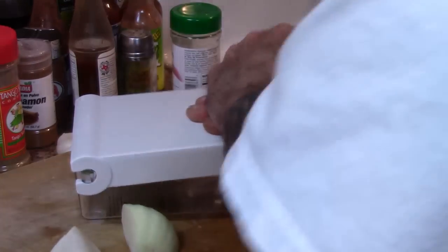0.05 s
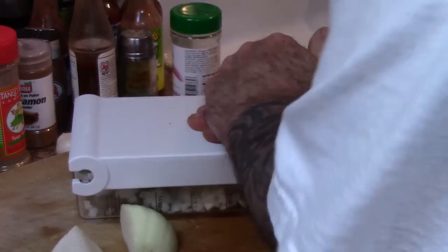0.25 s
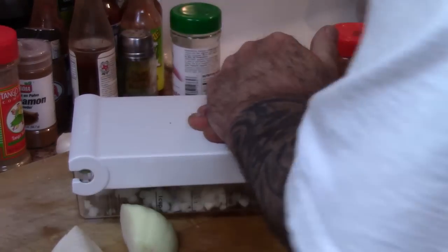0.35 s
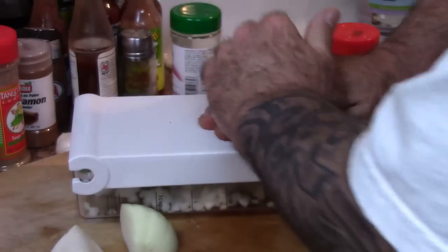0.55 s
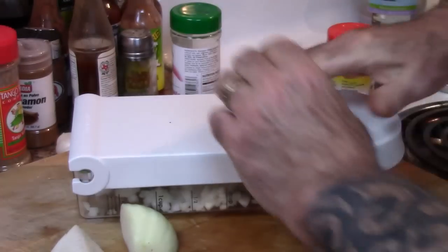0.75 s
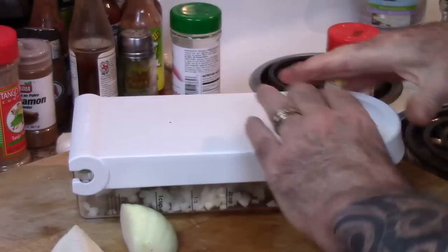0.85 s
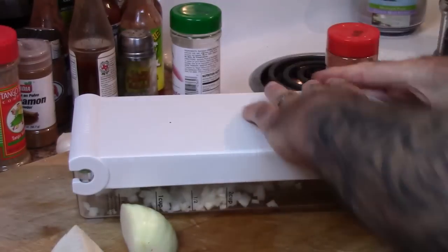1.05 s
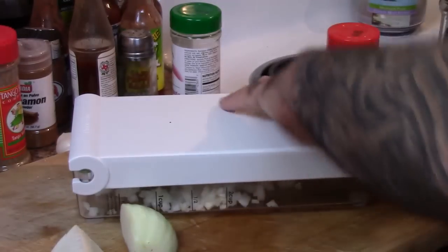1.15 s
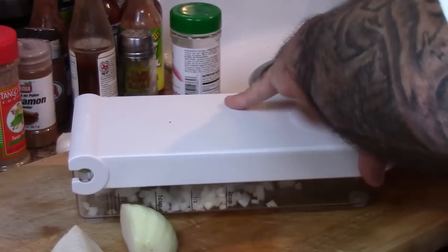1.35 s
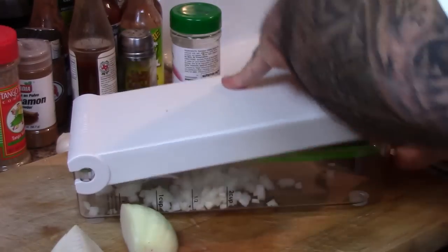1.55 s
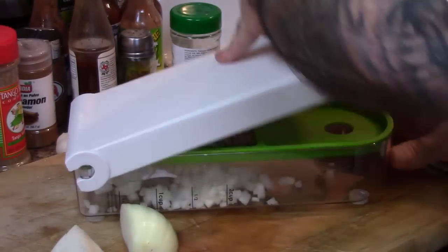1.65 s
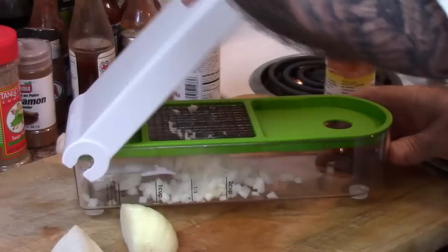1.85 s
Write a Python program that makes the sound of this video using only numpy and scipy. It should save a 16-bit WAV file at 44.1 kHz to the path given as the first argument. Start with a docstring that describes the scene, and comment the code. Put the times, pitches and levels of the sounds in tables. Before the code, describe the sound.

A plastic chopper slams shut through onion, a brief crunch bursting into a loud clattering crack with a low worktop boom. Quiet hand rubs, pats and lid clicks follow in a small, humming kitchen, closely miked.

```python
"""A plastic chopper in front of two close microphones: onion creaks and crunches through the blade
grid as a stream of tiny snaps, which swells into the slam of the lid on the tray: a dense wash of
snaps, bursts of noise and ringing modes. Fingers slide, pat and squeak on the lid, which unsticks
with a click and rattles open. Around it a small hard-walled kitchen hums and a sleeve rustles;
the slam drives the recorder's gain control far down, and it creeps back only slowly."""
import sys
import numpy as np
from scipy import signal
from scipy.fft import rfft, irfft, next_fast_len
from scipy.io import wavfile
from scipy.ndimage import uniform_filter1d, map_coordinates

SR = 44100
rng = np.random.default_rng(int(sys.argv[2]) if len(sys.argv) > 2 else 0)


def file_out(sig):
    """Save sig as 16-bit WAV at sys.argv[1]."""
    # one column per channel
    cols = np.atleast_2d(sig).T
    # limit, then scale
    lim = np.clip(cols, -1, 1)
    pcm = np.round(lim * 32767).astype(np.int16)
    wavfile.write(sys.argv[1], SR, pcm)


N = 83790

# shut lid and tray ringing together: pitch_hz, relative level_db, t60_s
CHOPPER_MODES = [(320, -6.5, 0.077), (485, -1.5, 0.11), (607, -2, 0.04), (719.4, -2.5, 0.057),
                 (941, 3.5, 0.017), (1050, -22, 0.039), (1345, -10, 0.074), (1536, -4, 0.033),
                 (1730, -5, 0.04), (2246, -7.5, 0.051), (3360, -1, 0.014), (3657, 0.5, 0.016),
                 (3967, -1, 0.027), (4337, 6, 0.007)]
# lid ringing freely once off the tray: pitch_hz, relative level_db, t60_s
LID_MODES = [(552.5, 5, 0.041), (750, -7, 0.025), (945, -1.5, 0.056), (1380, -8, .05), (1690, -21, 0.037),
             (1940, -16, 0.059), (2200, -11, 0.032), (3068, -12, 0.044), (3460, -6.5, .022),
             (3800, -3.5, 0.024), (4402, -25, 0.025)]
# tone of skin or pegs rubbing on plastic: frequency_hz, relative level_db
RUBBING_TONE = [(100, -17), (410, 0), (710, -0.5), (1210, -1), (2620, -7), (3650, -8), (5050, -18.5),
                (10000, -31)]


def amp(db):
    """Decibels to gain."""
    return 10 ** (np.asarray(db) / 20)


def unit(x):
    """Scale to rms 1."""
    return x / np.sqrt(np.mean(x ** 2) + 1e-20)


def along(points, hz):
    """Read a curve of (Hz, value) points on a log frequency axis."""
    point_hz, values = np.transpose(points)
    return np.interp(np.log(hz + 1), np.log(point_hz + 1), values)


def level(rows):
    """Gain per sample from (s, dB) points."""
    return amp(np.interp(np.arange(N) / SR, *np.transpose(rows)))


def wobble(rate):
    """A smooth random curve with rate knots a second."""
    knots = rng.standard_normal(int(N * rate / SR) + 4)
    return map_coordinates(knots, [np.arange(N) * rate / SR])


def coloured(x, points):
    """Causal minimum-phase filter with the given (Hz, dB) shape."""
    m = 2 * next_fast_len(x.shape[-1])
    cepstrum = irfft(np.log(amp(along(points, np.fft.rfftfreq(m, 1 / SR)))))
    # fold the cepstrum forward so that nothing sounds ahead of its cause
    cepstrum[1:m // 2] *= 2
    cepstrum[m // 2 + 1:] = 0
    response = np.exp(rfft(cepstrum))
    return irfft(rfft(x, m) * response)[..., :x.shape[-1]]


def add(track, s, sound):
    """Mix a sound into the track at time s."""
    part = track[round(s * SR):][:len(sound)]
    part += sound[:len(part)]


def appliances():
    """Steady tones, wavering in level and phase, hum like motors over a soft rush of filtered noise."""
    # motor tones: pitch_hz, level_db before waver
    tones = [(59.1, -44), (118.3, -54.5), (172.2, -46), (237.2, -51), (268.8, -46), (355.2, -59.5),
             (1243, -64)]
    # tone of the room noise: frequency_hz, relative level_db
    air_tone = [(20, -44), (50, 6.5), (100, -4), (200, -1.5), (280, 1), (450, -2), (640, -14.5),
                (920, -13.5), (1500, -23), (2500, -34), (3600, -18), (5000, -36.5), (9000, -45.5),
                (12000, -46)]
    air_db, waver_db = -39.5, 2
    t = np.arange(N) / SR
    hum = np.zeros(N)
    for hz, db in tones:
        loudness = amp(db + waver_db * wobble(10.72)) * np.sqrt(2)
        phase = 2 * np.pi * (hz * t + rng.random()) + 0.19 * wobble(3.4)
        hum += loudness * np.sin(phase)
    air = unit(coloured(rng.standard_normal(N), air_tone))
    return hum + amp(air_db) * air


def room_tail():
    """Hard, close walls answer with short, dense noise whose decay time depends on frequency."""
    # reverberation of the kitchen: frequency_hz, t60_s
    decay = [(100, 0.29), (400, .3), (1200, 0.34), (3200, .35), (6000, .32), (10000, 0.37)]
    build_up_s = 0.0037
    hz, t, bins = signal.stft(rng.standard_normal(SR), SR, nperseg=256)
    fading = amp(-60 * t / along(decay, hz)[:, None])
    spectrum = rfft(signal.istft(bins * fading, SR, nperseg=256)[1])
    # even out the broad spectrum, so that only the decay colours the room
    power = np.convolve(np.abs(spectrum) ** 2, np.hanning(81), "same")
    tail = irfft(spectrum / np.sqrt(power))[:SR // 2]
    tail = tail * (1 - np.exp(-(np.arange(len(tail)) / SR / build_up_s) ** 2))
    return tail / np.linalg.norm(tail)


def kitchen(x, room_db, count=4):
    """Direct sound plus room; successive moments take turns among tails, so the decay stays diffuse."""
    hop_s = 0.008
    turn = np.arange(N) / SR / hop_s
    room = np.zeros(N)
    for k in range(count):
        share = np.sin(np.pi / 2 * np.minimum((turn - k) % count, 2))
        room += signal.fftconvolve(x * share, room_tail())[:N]
    return x + amp(room_db) * room


def microphones(mid):
    """Two close capsules share the sound ahead and differ only by scatter, faint but for the top."""
    # scatter against the shared sound: frequency_hz, relative level_db
    width = [(60, -29), (150, -30.5), (400, -31.5), (1420, -20.5), (4090, -19), (11800, -4)]
    scatter = irfft(np.exp(2j * np.pi * rng.random(size=129)))
    side = coloured(signal.fftconvolve(mid, scatter)[:N], width)
    return np.array([mid + side, mid - side])


def sleeve():
    """Cloth brushing past gives filtered noise that flutters as the arm moves."""
    # brushing: time_s, level_db before flutter
    brushing = [(0, -51), (.14, -59), (.6, -61), (.76, -55), (1.1, -56), (1.25, -53.5), (1.38, -56.5),
                (1.6, -55.5), (1.89, -66)]
    # tone of the cloth: frequency_hz, relative level_db
    cloth_tone = [(200, -8.5), (900, 3.5), (2400, -4.5), (3700, 1.05), (5000, -7), (9000, -17),
                  (12000, -21.5)]
    flutter_db = 1.5
    rustle = unit(coloured(rng.standard_normal(N), cloth_tone))
    return rustle * level(brushing) * amp(flutter_db * wobble(57))


def counter():
    """The slam sets the worktop booming in a few low decaying modes."""
    # worktop modes: pitch_hz, level_db, t60_s
    worktop = [(65.46, -7, 0.28), (98.4, -6.5, 0.38), (128, 8, 0.12), (168.2, -0.5, 0.16), (367, -24, 0.22)]
    slam_s, rise_s = 0.245, 0.008
    out, t = np.zeros(N), np.arange(SR // 2) / SR
    boom = sum(amp(db - 60 * t / t60) * np.sin(2 * np.pi * hz * t) for hz, db, t60 in worktop)
    add(out, slam_s, boom * (1 - np.exp(-t / rise_s)))
    return out


def thumps():
    """Soft blows rock the tray on the board for a few low, quickly damped cycles."""
    # blows: start_s, level_db, pitch_hz, t60_s
    blows = [(0.2377, -1, 382, 0.0082), (0.731, -8, 264, 0.032), (0.7517, -0.5, 197, 0.017),
             (1.237, -15, 260.1, .03), (1.4813, -10.5, 218.4, .032), (1.512, -12, 244, 0.034),
             (1.7272, -10, 422, 0.024)]
    rise_s = 0.0054
    out, t = np.zeros(N), np.arange(SR // 4) / SR
    for s, db, hz, t60 in blows:
        envelope = amp(db - 60 * t / t60) * (1 - np.exp(-t / rise_s))
        add(out, s, envelope * np.sin(2 * np.pi * hz * t))
    return out


def ring(modes, bright_hz):
    """Ringing plastic; a contact excites most the modes near its own brightness."""
    contact_tilt = 0.69  # sharp contacts spare the low modes
    t = np.arange(SR // 4) / SR
    out = np.zeros(len(t))
    for hz, db, t60 in modes:
        ratio = hz / bright_hz
        drive = ratio ** contact_tilt / np.hypot(1, ratio ** 3)
        decay = amp(db + rng.normal(0, 1) - 60 * t / t60)
        out += decay * drive * np.sin(2 * np.pi * (hz * t + rng.random()))
    return out


def grains(curve, rate, spread_db, spectrum, ring_db, body):
    """Tiny random snaps, heard directly and through the ringing plastic body."""
    happens = rng.random(N) < rate / SR
    strength = amp(spread_db * np.clip(rng.standard_normal(N), -2, 2))
    snaps = happens * rng.choice([-1, 1], N) * strength
    force = unit(snaps) * level(curve)
    tick = coloured(signal.unit_impulse(len(body)), spectrum)
    answer = tick / np.linalg.norm(tick) + amp(ring_db) * body / np.linalg.norm(body)
    return signal.fftconvolve(force, answer)[:N]


def knocks(contacts, modes, crack_t60_s):
    """Each hard contact cracks and rings the plastic; low brightness makes both duller."""
    # tone of the crack: frequency_hz, relative level_db
    crack_tone = [(40, -46), (100, -23), (300, -8), (1000, -3.5), (2600, -6.5), (3650, 3.5), (4900, -4),
                  (6500, -10), (9000, -21), (11500, -34)]
    crack_brighter, contact_s = 1.8, 0.00035  # the crack reaches higher than the ring
    out, t = np.zeros(N), np.arange(SR // 4) / SR
    for s, ring_db, crack_db, bright_hz in contacts:
        cutoff_hz = min(crack_brighter * bright_hz, SR / 3)
        soften = signal.butter(2, cutoff_hz, fs=SR, output="sos")
        noise = coloured(rng.standard_normal(len(t)), crack_tone)
        crack = unit(signal.sosfilt(soften, noise)) * amp(crack_db - 60 * t / crack_t60_s)
        ringing = amp(ring_db) * ring(modes, bright_hz)
        add(out, s, (crack + ringing) * (1 - np.exp(-t / contact_s)))
    return out


def squeak():
    """A fingertip sticks and slips on the lid at a slightly unsteady rate, heard as one pure tone."""
    # squeak: time_s, peak level_db, pitch_hz before jitter
    glide = [(.755, -72, 750), (.772, -43, 755), (.795, -40.5, 793), (.825, -36.5, 798), (.85, -54, 770),
             (.87, -78, 775)]
    jitter = 0.011  # fraction of the pitch
    t = np.arange(N) / SR
    s, db, hz = np.transpose(glide)
    pitch = np.interp(t, s, hz) * (1 + jitter * wobble(150))
    loudness = np.interp(t, s, amp(db), left=0, right=0)
    return loudness * np.sin(2 * np.pi * np.cumsum(pitch) / SR)


def hand_slide():
    """Skin catches and slips on the shut lid in many small snaps."""
    # hand on the lid: time_s, level_db of the snaps
    stroke = [(.721, -71.5), (.766, -42.5), (.841, -44), (.881, -50), (1.01, -50), (1.121, -70),
              (1.251, -53.5), (1.41, -73.5)]
    slips_per_s, spread_db, ring_db = 1200, 3, -9.5
    body = ring(CHOPPER_MODES, bright_hz=895)
    return grains(stroke, slips_per_s, spread_db, RUBBING_TONE, ring_db, body)


def peg_scrape():
    """The lid's pegs catch again and again as they scrape out of the grid."""
    # pegs leaving the grid: time_s, level_db of the snaps
    lift = [(1.451, -71), (1.521, -49.5), (1.571, -51), (1.621, -48.5), (1.685, -46), (1.708, -40.5),
            (1.746, -45), (1.776, -41), (1.831, -45), (1.891, -38)]
    catches_per_s, spread_db, ring_db = 3200, 2, -0.5
    body = ring(LID_MODES, bright_hz=1200)
    return grains(lift, catches_per_s, spread_db, RUBBING_TONE, ring_db, body)


def lid_clicks():
    """The lid unsticks and rattles out of the grid, ringing freely at each contact."""
    # contacts: start_s, relative ring_db, crack_db, brightness_hz
    contacts = [(1.4803, -20.5, -36.5, 4390), (1.4828, -26, -43.5, 1191), (1.706, -31, -45.5, 1300),
                (1.7555, -19.5, -30.5, 1054), (1.7592, -21.5, -35, 2860), (1.777, -30.5, -39, 2493),
                (1.7955, -24.5, -55, 520), (1.7992, -20, -51, 601), (1.891, -29.5, -48, 2450)]
    return knocks(contacts, LID_MODES, crack_t60_s=0.032)


def slam():
    """Hard contacts on the shut chopper, the lid's slam loudest, ring lid and tray together."""
    # contacts: start_s, relative ring_db, crack_db, brightness_hz
    contacts = [(.1686, -25, -34.5, 740), (0.2319, -13, -26, 1410), (.2366, 5.5, -7.5, 560),
                (.2405, 22, 13.5, 3700), (.2442, 18, 14.5, 1994), (.7306, -38, -38, 3800)]
    return knocks(contacts, CHOPPER_MODES, crack_t60_s=0.03)


def onion_and_slam_wash():
    """Onion crunches in tiny snaps: faint, sagging a little, then swelling into a dense burst at the slam."""
    # the last, loudest points are the slam's own wash of noise: time_s, level_db of the snaps
    crunch = [(.13, -59), (.146, -39), (.17, -41.5), (.195, -44), (.214, -35), (.22, -24), (.23, -13.5),
              (.238, -7.5), (.243, 14), (.252, 9), (.271, -46), (.3, -91.5)]
    # tone of the snaps: frequency_hz, relative level_db
    snap_tone = [(50, -31), (130, -14), (330, 1.5), (700, 1), (1300, -2), (2500, -5.5), (3700, -1.5),
                 (5000, -9.5), (8000, -17.5), (11000, -30)]
    snaps_per_s, spread_db, ring_db = 3400, 2.5, -1
    body = ring(CHOPPER_MODES, bright_hz=1200)
    return grains(crunch, snaps_per_s, spread_db, snap_tone, ring_db, body)


def scene():
    """The chopper straight ahead; each part of it excites the room in its own way."""
    background = appliances() + sleeve()
    board = kitchen(thumps() + counter(), room_db=-12.5)
    rubbing = kitchen(hand_slide() + peg_scrape() + squeak(), room_db=-5.5)
    opening = kitchen(lid_clicks(), room_db=-7.5)
    closing = kitchen(slam(), room_db=-5.5)
    crunching = kitchen(onion_and_slam_wash(), room_db=0.56)
    return microphones(background + board + rubbing + opening + closing + crunching)


def record(dry):
    """Gain control ducks in milliseconds and recovers slowly; peaks are rounded, the band limited."""
    threshold_db, range_db, recovery_db_per_s, detector_s = -14.5, 28, 4.5, 0.0052
    ceiling, low_cut_hz, top_hz = 0.68, 24, 11200  # ceiling as a fraction of full scale
    t, keep = np.arange(N) / SR, np.exp(-1 / (detector_s * SR))
    power = signal.lfilter([1 - keep], [1, -keep], np.mean(dry ** 2, axis=0))
    excess_db = np.clip(10 * np.log10(power + 1e-12) - threshold_db, 0, range_db)
    # hold the deepest duck so far, released along a straight slope in dB
    recovered_db = recovery_db_per_s * t
    gain_db = recovered_db - np.maximum.accumulate(excess_db + recovered_db)
    x = dry * amp(uniform_filter1d(gain_db, size=32))
    x = x / (1 + (x / ceiling) ** 6) ** (1 / 6)
    x = signal.sosfilt(signal.butter(2, low_cut_hz, "high", fs=SR, output="sos"), x)
    return signal.sosfilt(signal.ellip(10, .1, 80, top_hz, fs=SR, output="sos"), x)


dry = scene()
out = record(dry)
file_out(out)
```